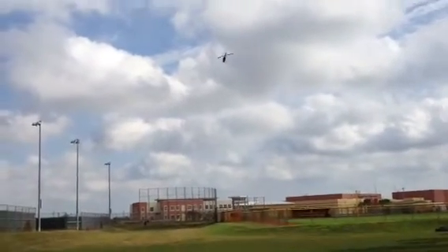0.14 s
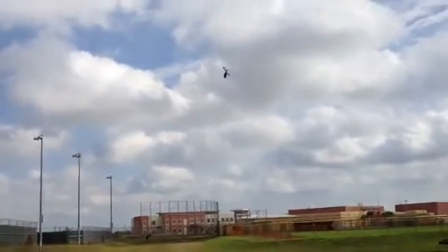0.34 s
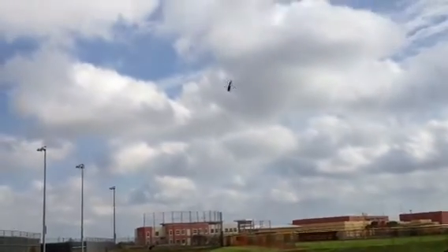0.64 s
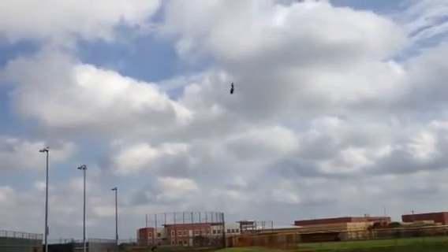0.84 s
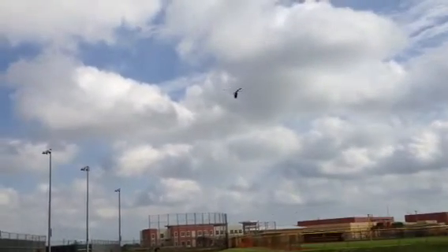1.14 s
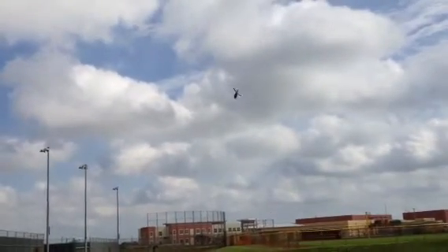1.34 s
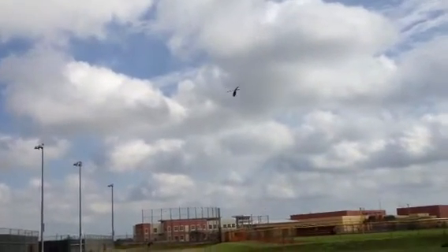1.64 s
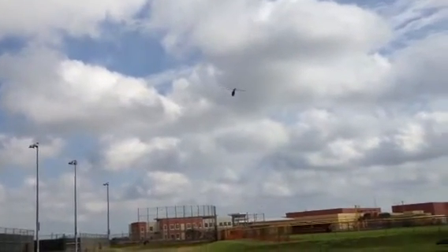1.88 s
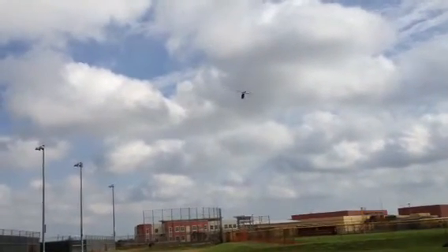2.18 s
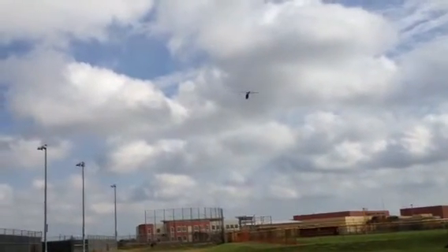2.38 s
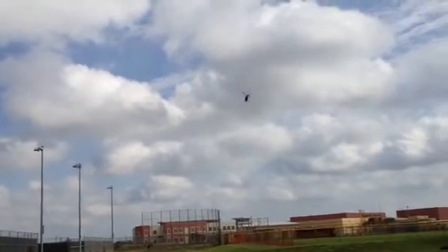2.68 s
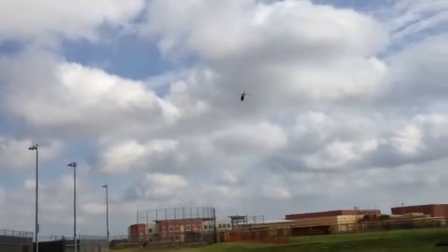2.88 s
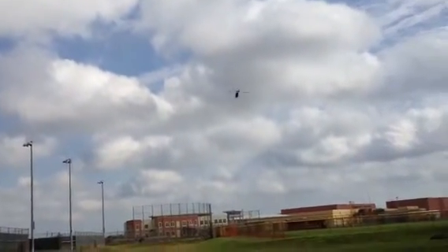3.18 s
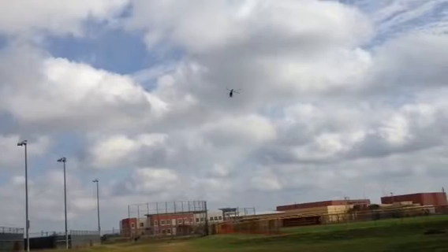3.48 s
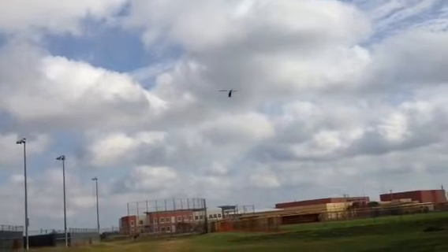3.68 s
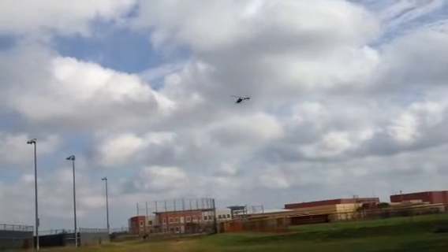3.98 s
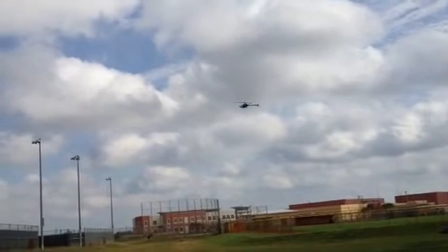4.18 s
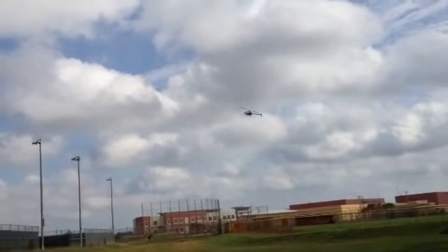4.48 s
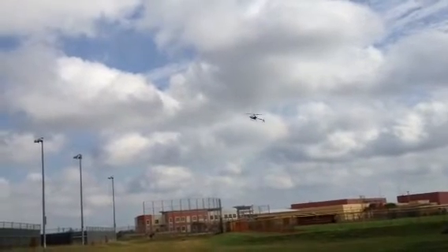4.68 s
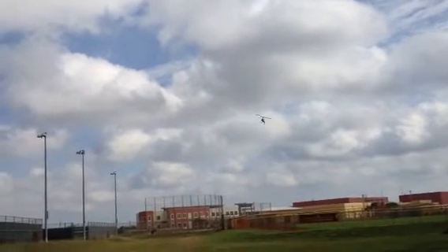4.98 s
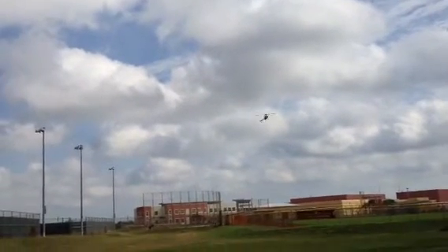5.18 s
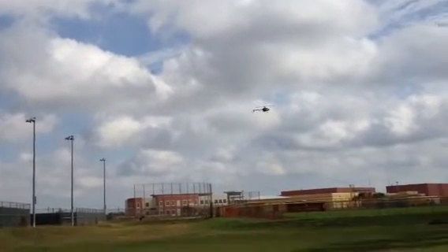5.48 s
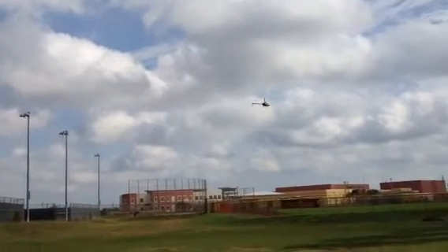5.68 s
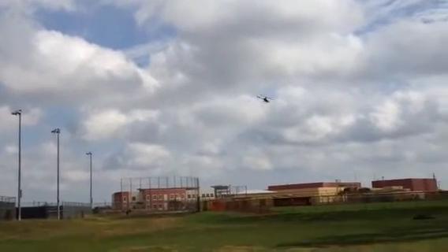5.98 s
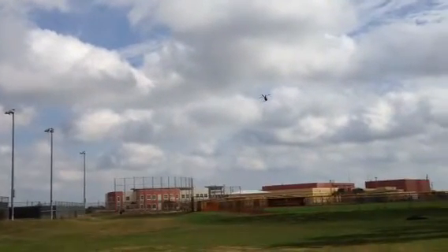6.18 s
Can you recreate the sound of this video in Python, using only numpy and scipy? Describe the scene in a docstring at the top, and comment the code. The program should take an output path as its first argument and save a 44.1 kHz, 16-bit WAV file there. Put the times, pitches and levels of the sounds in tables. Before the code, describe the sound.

A small electric model helicopter flies over an open field with a steady high gear whine and a fast, fluttering whir of blades. Gusts of wind hit the microphone in low, ragged thuds, louder than the helicopter through the first half. The wind then drops to light puffs and the whine stands clearer, swelling and fading as the machine turns, its pitch rising very slightly near the end.

```python
"""Model helicopter in the wind

A small electric model helicopter hovers and spins round over a park. Its gears whine at multiples
of the rotor speed, teeth and blades chatter once and twice a turn, and each part swells as the
machine turns its side. Puffs of wind shed eddies (little swirls of air) on the microphone opening,
heard as short low thuds that brighten with the wind."""
import sys
import numpy as np
from scipy import signal
from scipy.fft import rfft, irfft, next_fast_len
from scipy.io import wavfile
from scipy.ndimage import uniform_filter1d, map_coordinates

SR = 44100
rng = np.random.default_rng(int(sys.argv[2]) if len(sys.argv) > 2 else 0)


def store_wav(level_fs):
    """Save 16-bit WAV to argv[1]."""
    pcm = np.round(np.clip(np.atleast_2d(level_fs), -1, 1) * 32767)
    wavfile.write(sys.argv[1], SR, pcm.T.astype(np.int16))


N = 279153

# How fast the gear teeth meet (mesh), as heard in flight. Each row: time in seconds, rate in Hz.
MESH_RATE = [(0, 3711.4), (0.8, 3709.2), (1.2, 3701.6), (2, 3696.1), (3.2, 3694.0), (3.8, 3701.3),
             (4, 3727.5), (4.15, 3729.5), (4.55, 3685.0), (4.8, 3686.0), (5, 3724.5), (5.3, 3757.5),
             (5.7, 3761.3), (6.1, 3772.0), (6.33, 3764.5)]
# Loudness of the tone at that rate. Each row: time in seconds, level in dB.
MESH_LEVEL = [(0, -59), (.12, -54.5), (.5, -54), (.67, -45), (.8, -59), (1.2, -57), (1.7, -66), (2.1, -57),
              (2.35, -55), (2.55, -66), (2.8, -59), (3.1, -65.5), (3.33, -59), (3.6, -72), (3.95, -66),
              (4.1, -44), (4.2, -48), (4.3, -63), (4.65, -62), (5.1, -72), (5.43, -52), (6.12, -53),
              (6.33, -64)]
# Side tones that make it throb. Each row: time in seconds, level in dB above the mesh tone.
THROB_LEVEL = [(0, -2.5), (2, -0.5), (3.6, -11), (4, -8), (5.2, -6), (6.33, -7)]
# Whines as the machine turns. Each row: time in seconds, then in dB the tail gear above the
# tail wash, twice the mesh rate above the rasp, three times the mesh rate above the hiss.
WHINE_LEVELS = [(0, -17, 0, -7), (.3, -24, -11, -7), (.67, -1, 1, -3), (.95, -11, -4, -7),
                (1.2, -5, 3, -10), (1.8, -9, 1, -16), (2.3, -7.5, 1.5, -7), (2.9, -7, 2, -11),
                (3.82, -4, 7.5, -21), (4.1, -2.5, -13, -4), (4.35, -3, -5, -12), (4.75, -0.5, -9, -39),
                (5.05, -8, -7, -1.5), (5.25, 1, -21, -9), (5.4, -6, -13, -3), (5.7, 1, -14, -5),
                (6.14, 5, -13, -6), (6.33, -4, -18, -12)]
# Blur of the whine at twice the mesh rate. Each row: time in seconds, noisy share from 0 to 1.
SECOND_BLUR = [(0, 0.33), (3.3, 0.36), (3.55, 0.86), (4, 0.8), (4.4, 0.6), (5.2, 0.4), (5.4, 0), (6.33, 0)]
# The tones in six whines. Each row: multiple of the tail or mesh rate, shift in steps of the rotor
# rate, shift in steps of the pinion (small motor gear) rate, relative level in dB.
TAIL_TONES = [(10, 0, 0, -9), (18, 0, 0, -9), (19, 0, 0, -8), (20, 0, 0, 0), (21, 0, 0, -2),
              (22, 0, 0, -12)]
HUM_TONES = [(4, 0, 0, 0), (6, 0, 0, -8)]
MESH_TONES = [(1, 0, 0, 0)]
THROB_TONES = [(1, -2, 0, -3.5), (1, -1, 0, 0), (1, 1, 0, -8.5), (1, 0, -1, -9.5), (1, 0, 1, -6.5)]
SECOND_TONES = [(2, -2, 0, -9), (2, -1, 0, 0), (2, 0, 0, -4), (2, 1, 0, -6), (2, 2, 0, -11), (2, 5, 0, -14),
                (2, 0, -2, -12), (2, 1, -2, -15), (2, -1, -1, -15), (2, 0, -1, -11), (2, 1, -1, -14),
                (2, -2, 2, -16), (2, 0, 2, -14)]
THIRD_TONES = [(3, 0, -3, -10), (3, 0, -1, -3), (3, -1, 0, -7), (3, 0, 0, 0), (3, 1, 0, -8), (3, 0, 1, -4)]

# Four rushing noises. Each row: time in seconds, then levels in dB of the blade wash (pushed air),
# tail wash, frame rattle and rotor head knocks.
RUSH_LEVELS = [(0.0, -55, -69, -59, -56), (0.05, -54.5, -60, -61, -64), (0.26, -54.5, -60.5, -57, -52.5),
               (0.62, -49, -54.5, -53, -46.5), (0.93, -54.5, -54.5, -61, -56.5),
               (1.09, -48.5, -49.5, -52.5, -50.5), (1.41, -50.5, -48, -55, -49),
               (1.53, -49, -48, -56.5, -56), (2.03, -52, -53, -56, -54), (2.34, -49, -49, -54.5, -48.5),
               (2.52, -52, -51.5, -53.5, -55.5), (3.4, -49.5, -50, -57, -54.5), (4.05, -55, -51, -56, -57),
               (4.2, -43, -43.5, -59, -53), (4.37, -46, -47.5, -56, -54), (4.48, -49.5, -48.5, -54, -51.5),
               (4.78, -46.5, -44.5, -49, -56), (5.02, -52, -57.5, -63, -61), (5.2, -52, -62, -57, -52),
               (5.46, -52, -55.5, -53, -60), (5.87, -51, -52, -50, -52), (5.99, -52, -60.5, -50.5, -59),
               (6.1, -54.5, -53, -53, -57), (6.33, -53, -60.5, -58, -59)]
# Two more, gear rasp and motor hiss. Each row: time in seconds, level in dB.
RASP_LEVEL = [(0.0, -59), (0.56, -56.5), (0.63, -53), (0.88, -56.5), (1.41, -44.5), (1.59, -54.5),
              (1.66, -42.5), (1.78, -55), (1.87, -43.5), (2.03, -58), (2.11, -43), (2.19, -48.5),
              (2.34, -41), (2.63, -48.5), (2.82, -42), (2.92, -49.5), (3.0, -43.5), (3.12, -53.5),
              (3.15, -46), (3.75, -46.5), (3.79, -43.5), (4.11, -47), (4.18, -42), (4.37, -51),
              (4.53, -43.5), (4.76, -48.5), (4.83, -39), (4.95, -54), (5.08, -57), (5.39, -48), (5.53, -53),
              (5.77, -47.5), (6.08, -53.5), (6.15, -45), (6.24, -55), (6.33, -54)]
HISS_LEVEL = [(0.0, -61.5), (0.37, -55.5), (0.44, -50.5), (0.93, -61), (1.41, -50.5), (1.57, -59),
              (1.66, -50), (1.76, -58), (1.92, -51.5), (1.97, -58), (2.27, -53), (2.33, -45.5),
              (2.73, -51.5), (2.84, -48.5), (3.08, -58), (4.02, -51), (4.39, -58.5), (4.48, -48.5),
              (5.59, -57), (5.73, -50.5), (5.98, -56), (6.15, -51), (6.24, -59), (6.33, -57)]
# Those six noises in order. Each row: low and high edge in Hz, share that repeats every turn, beats.
# Each beat: place in turns, height, width in turns.
RUSH_PARTS = [(216, 2065, 0.054, [(.13, 0.92, 0.046), (.63, 0.63, 0.02)]),
              (2150, 3490, 0.013, [(.13, 0.39, 0.055), (.63, 0.18, 0.014)]),
              (2960, 4300, 0.29, [(1, 0.52, 0.058), (0.58, 0.42, 0.024), (0.87, 0.97, 0.049)]),
              (4450, 5600, 0.4, [(.985, 5.5, .02), (.31, 1.3, .025), (.485, 2.6, .022), (.8, 2.6, .03)]),
              (5600, 8900, 0.18, [(.25, .6, 0.086), (.76, .9, 0.018)]),
              (9260, 35300, 0.043, [(.8, 0.5, 0.14)])]
# Rattle and knocks come later and are partly hidden as the machine swings round.
# Each row: time in seconds, lag in turns, beat strength from 0 to 1.
HEADING = [(0, 0, 1), (1, 0, .9), (1.5, 0, .65), (3.8, .07, .45), (4.6, .34, .55), (5.1, .52, .9),
           (5.35, .54, .9), (5.5, .6, .2), (6.33, .7, .2)]
# Tone colour of the rushing noises. Each row: frequency in Hz, gain in dB.
RUSH_COLOUR = [(200, -10.5), (550, -5.5), (1900, -5), (2600, -0.5), (3150, -8.5), (4300, 0), (4850, -1),
               (5300, -12), (6500, -8), (6750, -2.5), (7200, -1.5), (7370, 2), (7550, -2.5), (8100, -3),
               (9500, -13), (11300, -10.5), (15200, -15)]
# Ground echo, stronger when the machine is farther out. Each row: time in seconds, gain from 0 to 1.
ECHO_GAIN = [(0, 0), (3.9, .1), (4.2, .3), (5, .45), (6.33, .45)]

# The strongest eddies. Each row: time in seconds, thud level in dB, pitch in Hz, snap level in dB.
# eddies() adds a fixed trim to both levels.
STRONG_EDDIES = [(0.013, -23, 442, -18.5), (0.04, -11, 328, -8), (0.059, -16, 595, -14),
                 (0.076, -15.5, 274, -30), (0.108, -21.5, 288, -28.5), (0.305, -28, 278, -28.5),
                 (0.372, -18.5, 160, -42), (0.388, -19, 210, -44), (0.496, -18.5, 187, -57),
                 (0.686, -25, 204, -44), (0.721, -20, 179, -32), (0.739, -19.5, 248, -39),
                 (0.772, -17, 189, -51), (0.872, -17.5, 267, -41), (0.898, -16, 240, -23.5),
                 (0.919, -8.5, 272, -16.5), (0.949, -22, 189, -40), (0.983, -21, 218, -41),
                 (1.01, -14.5, 256, -20.5), (1.053, -16.5, 282, -26.5), (1.315, -16.5, 218, -33),
                 (1.353, -17, 210, -26.5), (1.6, -22, 266, -26), (1.635, -19, 229, -19.5),
                 (1.66, -18, 342, -17), (1.773, -21.5, 255, -34.5), (1.811, -21, 260, -41),
                 (2.04, -19, 253, -31), (2.091, -20, 175, -40), (2.212, -20.5, 209, -35),
                 (2.336, -13.5, 230, -45), (2.368, -19, 205, -50), (2.389, -21, 221, -45),
                 (2.415, -14.5, 230, -27.5), (2.433, -19, 330, -33), (2.452, -16, 410, -32),
                 (2.476, -14, 259, -25.5), (2.495, -10, 255, -26), (2.571, -22.5, 312, -37),
                 (2.596, -22, 290, -31), (2.637, -22.5, 336, -31), (2.736, -15, 228, -38),
                 (3.569, -27.5, 184, -59), (3.66, -31, 170, -54), (3.728, -27, 193, -38),
                 (3.848, -30.5, 180, -51), (4.093, -24.5, 210, -52), (4.165, -26, 204, -56),
                 (4.41, -25, 183, -57), (4.649, -25, 218, -59), (4.894, -28.5, 165, -44),
                 (5.633, -23.5, 186, -43), (5.706, -29, 206, -49), (5.752, -28, 188, -49),
                 (5.813, -20.5, 177, -38), (6.237, -25, 268, -44), (6.295, -27, 198, -45)]
# Puffs of wind. Each row: centre in seconds, half length in seconds, level in dB.
WIND_PUFFS = [(0.034, 0.085, -23.5), (0.269, 0.055, -26.5), (0.386, 0.027, -25.5), (0.487, 0.015, -27.5),
              (0.754, 0.14, -26), (0.923, 0.087, -23.5), (1.04, 0.041, -26), (1.26, 0.072, -29),
              (1.363, 0.037, -26), (1.49, 0.061, -33), (1.629, 0.052, -21.5), (1.826, 0.045, -27),
              (2.06, 0.086, -27.5), (2.343, .06, -25), (2.458, 0.057, -24), (2.62, 0.04, -36),
              (2.777, 0.056, -31.5), (2.887, 0.038, -40.5), (3.29, 0.018, -43), (3.445, 0.025, -43),
              (3.69, 0.072, -36.5), (3.86, 0.023, -38), (4.066, .04, -37.5), (4.182, 0.017, -40),
              (4.3, .025, -45), (4.418, 0.034, -35), (4.497, 0.062, -38), (4.91, 0.085, -41),
              (5.114, 0.018, -49), (5.527, .03, -36.5), (5.634, 0.024, -43), (5.767, 0.07, -35),
              (5.95, 0.035, -42.5), (6.077, 0.016, -46), (6.25, 0.14, -36.5)]
# Wind between the puffs. Each row: time in seconds, level in dB.
LULL_LEVEL = [(0, -40), (2.6, -40), (3.1, -54.5), (3.6, -51.5), (5.3, -48), (6.33, -50)]
# Tone colours of the wind, deep to bright. Each row: frequency in Hz, gain in dB.
RUMBLE_COLOUR = [(20, -24), (60, -13.5), (110, -5), (150, 1), (250, -11), (400, -57)]
THUD_COLOUR = [(25, -46), (60, -31), (120, 2), (180, 5), (280, -3.5), (450, -10.5), (900, -48.5)]
SNAP_COLOUR = [(150, -38), (450, 3.5), (800, -8.5), (1300, -17.5), (2300, -29.5), (4000, -68)]

MAIN_TEETH, PINION_TEETH, TAIL_RATIO = 112, 11, 3.8535  # ratio: tail turns for each rotor turn
TIGHT_SPOT = .77  # place in turns where the out-of-round main gear presses hardest
HUM_CENTRE_S, HUM_WIDTH_S, HUM_DB = 5.78, 0.14, -54  # a low tail rotor hum comes through once
ECHO_DELAY_S, ECHO_LOW_HZ, ECHO_TOP_HZ = .00167, 764, 2470
SMALL_EDDIES_PER_S, SMALL_EDDY_HZ, SCATTER_DB = 30, 201.7, 2.5


def gears(turns):
    """Meeting teeth whine: the tail drive, and the main gear at 1, 2 and 3 times its mesh rate."""
    tail_db, second_db, third_db = curves(WHINE_LEVELS)
    mesh_db = curves(MESH_LEVEL)[0]
    hum_db = HUM_DB - 6 * ((np.arange(N) / SR - HUM_CENTRE_S) / HUM_WIDTH_S) ** 2
    whines = [(curves(RUSH_LEVELS)[1] + tail_db, TAIL_TONES, TAIL_RATIO, .015),
              (hum_db, HUM_TONES, TAIL_RATIO, .015),
              (mesh_db, MESH_TONES, MAIN_TEETH, .03),
              (mesh_db + curves(THROB_LEVEL)[0], THROB_TONES, MAIN_TEETH, .015),
              (curves(RASP_LEVEL)[0] + second_db, SECOND_TONES, MAIN_TEETH, curves(SECOND_BLUR)[0]),
              (curves(HISS_LEVEL)[0] + third_db, THIRD_TONES, MAIN_TEETH, .1)]
    return sum(amp(db + .8 * wobble(7)) * whine(turns, tones, cycles_per_turn, blur)
               for db, tones, cycles_per_turn, blur in whines)


def whine(turns, tones, cycles_per_turn, blur):
    """Tones tied to the rotor. Close ones throb together; blur turns a share into narrow noise."""
    out = np.zeros(N)
    for multiple, rotor, pinion, db in tones:
        cycles = multiple * cycles_per_turn + rotor + pinion * MAIN_TEETH / PINION_TEETH
        angle = 2 * np.pi * cycles * (turns - TIGHT_SPOT) + 0.53 * wobble(4.14)
        size = np.sqrt(1 - blur) * (1 + 0.21 * wobble(6.3)) + np.sqrt(blur) * wobble(45)
        out += amp(db) * size * np.sin(angle)
    return unit(out)


def rush(turns):
    """Six parts of the machine each make a band of noise that beats as the rotor turns."""
    repeating, out = unit(chatter(turns)), np.zeros(N)
    heading, steady = curves(HEADING), (0, 1)
    views = [steady, steady, heading, heading, steady, steady]
    levels = [*curves(RUSH_LEVELS), *curves(RASP_LEVEL), *curves(HISS_LEVEL)]
    for db, (lag, strength), (low_hz, high_hz, share, beats) in zip(levels, views, RUSH_PARTS):
        pulses = sum(height * np.exp(-.5 * (((turns - lag - at + .5) % 1 - .5) / width) ** 2)
                     for at, height, width in beats)
        noise = np.sqrt(share) * repeating + np.sqrt(1 - share) * rng.standard_normal(N)
        beating = noise * (1 + strength * pulses) * (1 + 0.087 * wobble(25))
        edges = lambda hz: np.sqrt((1 + (low_hz / (hz + 1)) ** 24) * (1 + (hz / high_hz) ** 24))
        out += amp(db) * unit(filtered(beating, lambda hz: colour_gain(RUSH_COLOUR, hz) / edges(hz)))
    return patchy(out, depth_db=2.13)


def chatter(turns):
    """Flaws in the teeth come back every turn; the pattern drifts with the angle of view."""
    steps, drift = 1024, np.arange(N) / SR * 1.3
    patterns = rng.standard_normal((int(drift[-1]) + 2, steps + 1))
    return map_coordinates(patterns, [drift, turns % 1 * steps], order=1)


def patchy(x, depth_db):
    """Moving air and the turning body shift the colour in patches a few hundred Hz wide."""
    spectra = signal.stft(x, nperseg=512)[2]
    patches = uniform_filter1d(rng.standard_normal(spectra.shape), size=4, axis=0)  # across pitch
    patches = uniform_filter1d(patches, size=36, axis=1)  # across time
    return signal.istft(spectra * amp(depth_db * unit(patches)), nperseg=512)[1][:N]


def with_ground_echo(x):
    """The direct sound plus a dull, late, upside-down copy off the grass."""
    band = lambda hz: 1 / np.sqrt((1 + (hz / ECHO_TOP_HZ) ** 6) * (1 + (ECHO_LOW_HZ / (hz + 1)) ** 4))
    echo = filtered(x, lambda hz: np.exp(-2j * np.pi * hz * ECHO_DELAY_S) * band(hz))
    return x - curves(ECHO_GAIN)[0] * echo


def eddies():
    """Each eddy swings the air pressure about twice, a thud torn by a short ragged snap."""
    half = 1024
    t = np.arange(-half, half) / SR
    thuds, snaps = np.zeros((2, N + 2 * half))
    rows = [*small_eddies(), *STRONG_EDDIES]
    for (s, db, hz, snap_db), phase in zip(rows, rng.uniform(0, 2 * np.pi, len(rows))):
        at = slice(round(s * SR), round(s * SR) + 2 * half)
        swell = np.exp(-.5 * (t * hz / 0.54) ** 2)
        thuds[at] += amp(db + 0.7) * swell * np.sin(2 * np.pi * hz * t + phase)
        snaps[at] += amp(snap_db - 5.5) * np.exp(-np.abs(t) / 0.0048)
    return thuds[half:half + N] + snaps[half:half + N] * coloured_noise(SNAP_COLOUR)


def small_eddies():
    """Random rows like those of STRONG_EDDIES, louder when the wind is stronger."""
    count = int(SMALL_EDDIES_PER_S * N / SR)
    times = (np.arange(count) + rng.uniform(0, 1, count)) / SMALL_EDDIES_PER_S
    size, pitch, tear = rng.standard_normal((count, 3)).T
    db = gust_db()[(times * SR).astype(int)] + 2.5 + SCATTER_DB * size
    snap_db = db - 19.5 + SCATTER_DB * (pitch + tear)
    return np.transpose([times, db, SMALL_EDDY_HZ * np.exp(0.19 * pitch), snap_db])


def wind():
    """Air presses unevenly on the microphone opening; stronger flow sounds brighter."""
    level_db = gust_db()
    lumps_db = 3.95 * wobble(17) + 2.27 * wobble(45)
    rumble = amp(0.52 * level_db - 25.5) * coloured_noise(RUMBLE_COLOUR, 0.64 * lumps_db)
    thud = amp(level_db - 5.5) * coloured_noise(THUD_COLOUR, lumps_db)
    snap = amp(1.3 * level_db - 19.5) * coloured_noise(SNAP_COLOUR, 0.93 * lumps_db)
    return rumble + thud + snap


def gust_db():
    """Strength of the wind: the lulls plus the smooth rise and fall of every puff."""
    t = np.arange(0, N / SR, .002)
    puffs = sum(amp(db - 7.2 * ((t - s) / half) ** 2) for s, half, db in WIND_PUFFS)
    return 20 * np.log10(amp(curves(LULL_LEVEL)[0]) + np.interp(np.arange(N) / SR, t, puffs))


def coloured_noise(colour, swell_db=0):
    """Noise that follows swell_db, given a tone colour and scaled to level 1."""
    return unit(filtered(rng.standard_normal(N) * amp(swell_db), lambda hz: colour_gain(colour, hz)))


def colour_gain(colour, hz):
    """Gain of a tone colour table at these frequencies."""
    row_hz, row_db = np.transpose(colour)
    return amp(np.interp(np.log(hz + 1), np.log(row_hz + 1), row_db))


def amp(db):
    """Turn dB into a gain."""
    return 10 ** (np.asarray(db) / 20)


def unit(x):
    """Scale x to an average (rms) level of 1."""
    return x / np.sqrt(np.mean(x ** 2) + 1e-20)


def curves(rows):
    """One value per sample for each column after the time."""
    times, *columns = np.transpose(rows)
    return [np.interp(np.arange(N) / SR, times, column) for column in columns]


def wobble(rate):
    """A smooth curve through `rate` random points a second."""
    at = np.arange(0, N + 64, 64)
    points = rng.standard_normal(int(N * rate / SR) + 4)
    return np.interp(np.arange(N), at, map_coordinates(points, [at * rate / SR]))


def filtered(x, response):
    """Multiply each frequency in x by response(hz)."""
    size = next_fast_len(N + 8192)
    return irfft(rfft(x, size) * response(np.fft.rfftfreq(size, 1 / SR)), size)[..., :N]


def scene():
    """The helicopter in the open, with wind at the microphone."""
    turns = np.cumsum(curves(MESH_RATE)[0]) / SR / MAIN_TEETH  # rotor turns so far
    return (gears(turns) + with_ground_echo(rush(turns)) + wind() + eddies())[None]


def record(dry):
    """The microphone weakens bass below 85 Hz and keeps nothing above 15260 Hz."""
    return filtered(dry, lambda hz: (hz < 15260) / np.sqrt(1 + (85 / (hz + 1)) ** 4))


dry = scene()
out = record(dry)
store_wav(out)
```